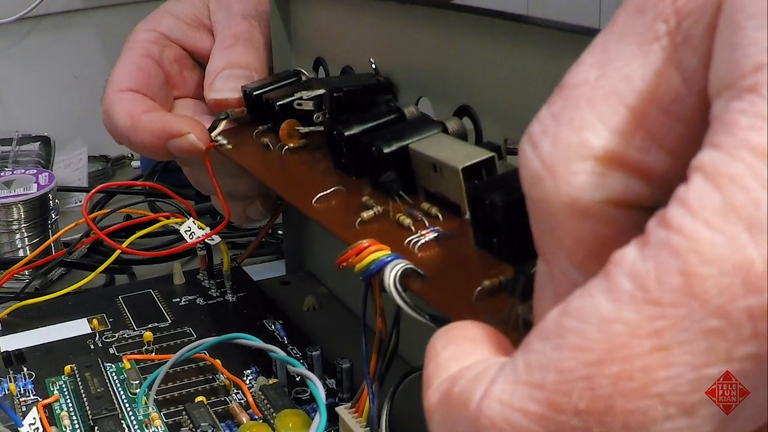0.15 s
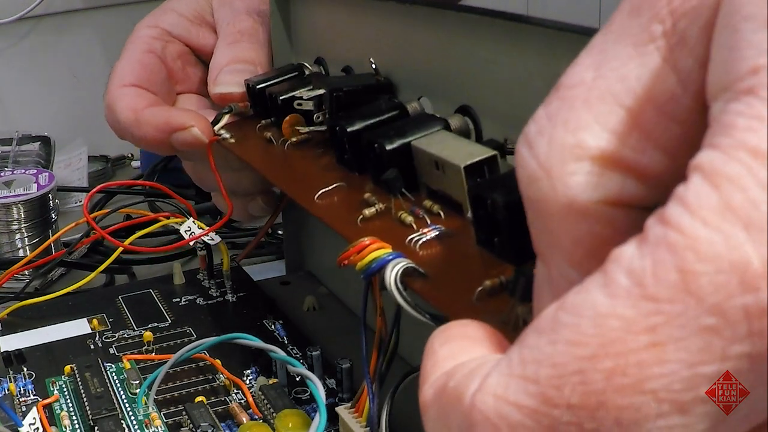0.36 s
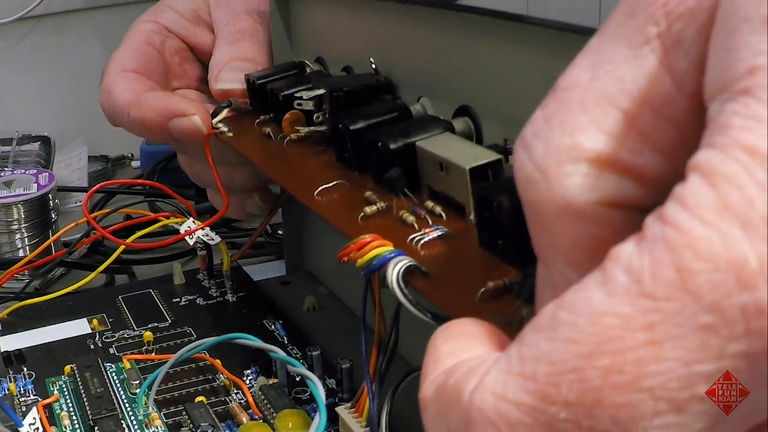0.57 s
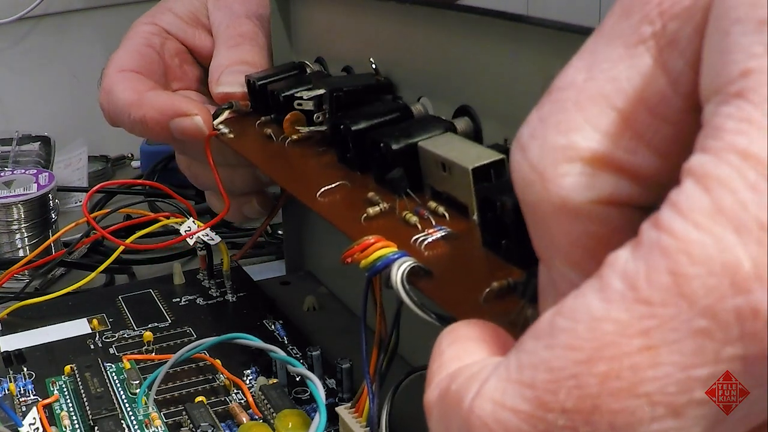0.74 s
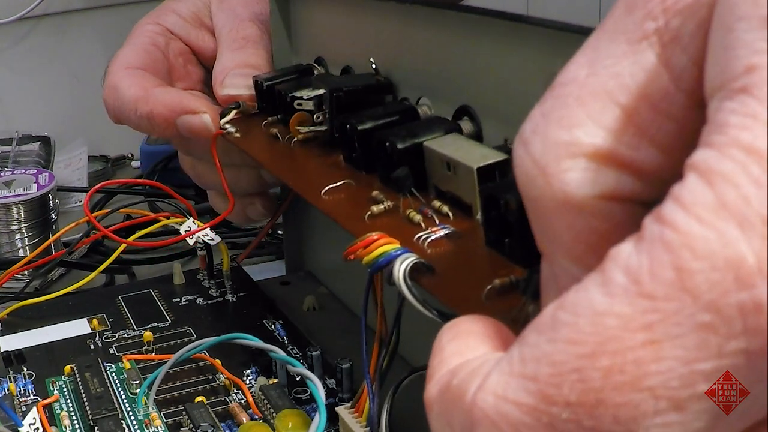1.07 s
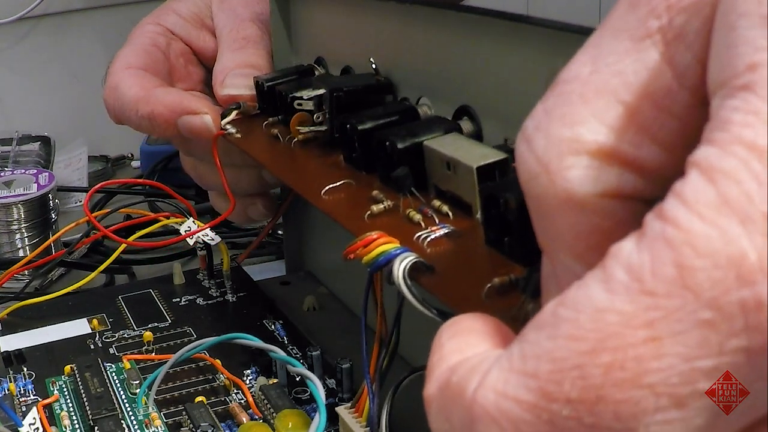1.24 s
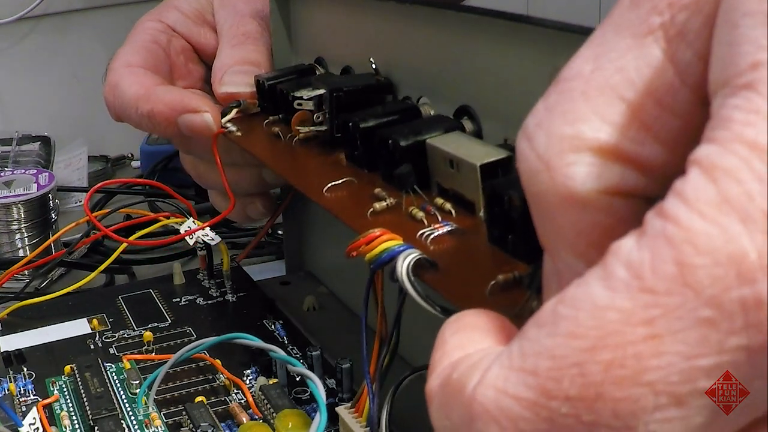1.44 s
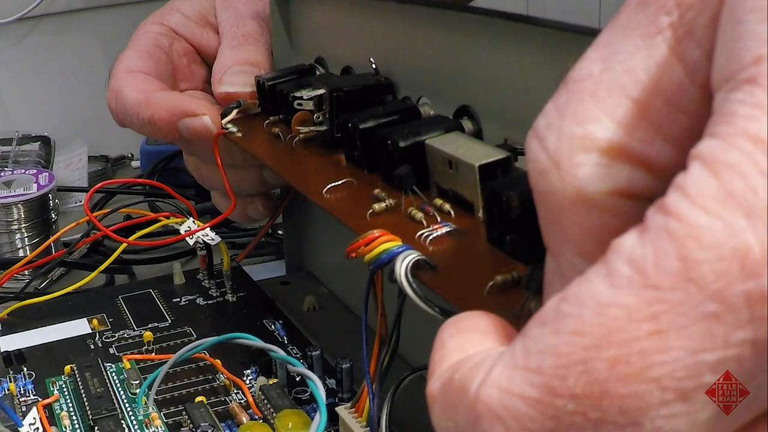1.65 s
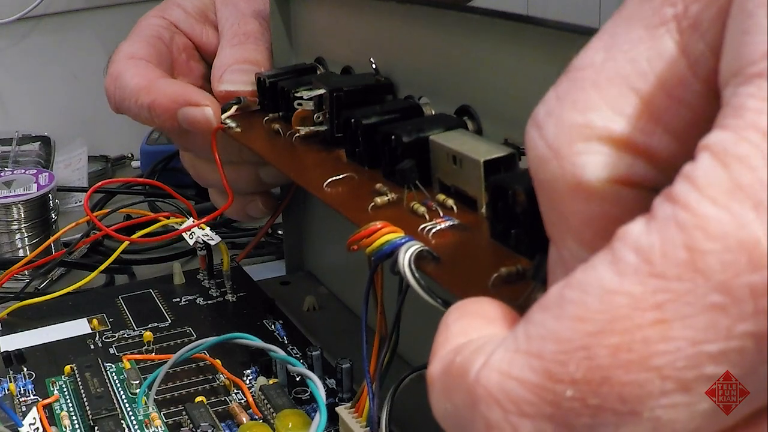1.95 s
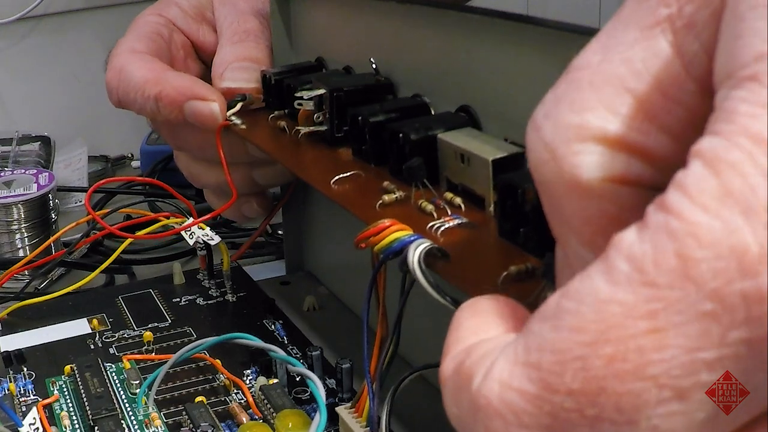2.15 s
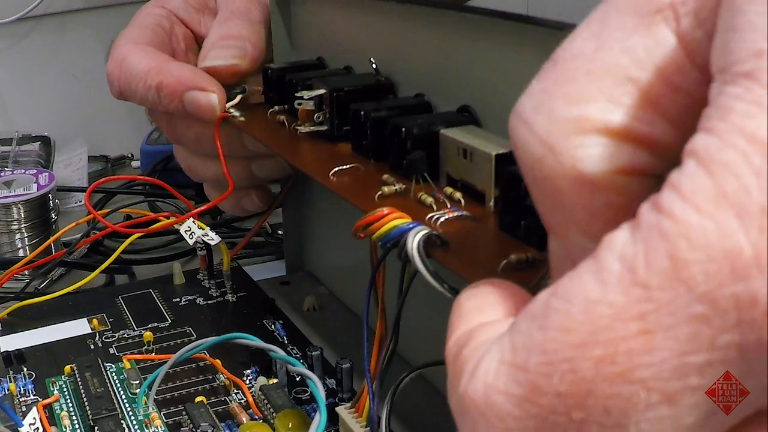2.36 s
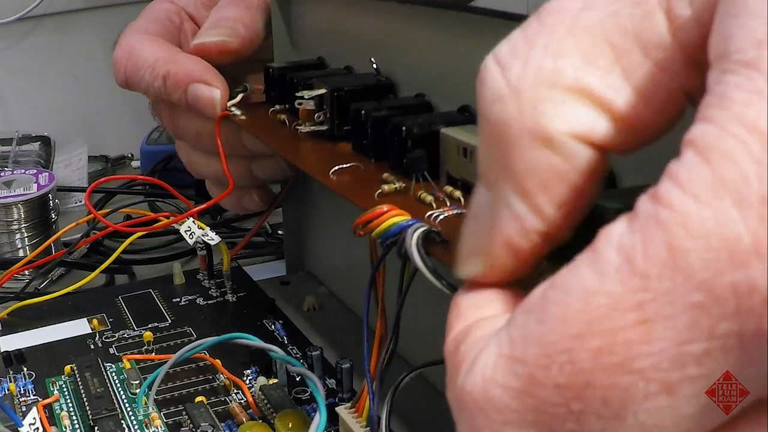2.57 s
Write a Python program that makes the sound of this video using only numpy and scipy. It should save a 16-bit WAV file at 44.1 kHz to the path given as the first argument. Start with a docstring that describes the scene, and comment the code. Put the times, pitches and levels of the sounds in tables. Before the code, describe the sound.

Circuit board handled by fingers, soft knocks and small metal clicks building to a busy clatter

```python
"""Fingers work small metal fittings on a circuit board held over a bench, heard close by.
Soft pushes come first, each a rough shove that makes the board and bench ring low and briefly.
A harder bunch follows near 0.87 s and a firm knock near 1.42 s; metal clicks rattle, skin rustles.
Knocks and clicks are busiest from 2.04 to 2.25 s, then thin out and stop near 2.5 s.
Throughout, the gripped board murmurs, the bench rumbles, a room echoes and a faint hiss goes on."""
import sys
import numpy as np
from scipy import signal
from scipy.fft import rfft, irfft, next_fast_len
from scipy.io import wavfile
from scipy.ndimage import map_coordinates

SR = 44100
rng = np.random.default_rng(int(sys.argv[2]) if len(sys.argv) > 2 else 0)


def unload_audio(sound):
    """Save the sound as a 16-bit wav file, at the path given as the first command line argument."""
    columns = np.transpose(np.atleast_2d(sound))
    # keep every value between -1 and 1, then stretch to whole-number steps
    steps = np.round(np.clip(columns, -1, 1) * 32767)
    wavfile.write(sys.argv[1], SR, steps.astype(np.int16))


N = 119070  # length of the scene in samples

DRIFT = 0.015  # random relative change of pitch from one blow to the next

# Pushes on the board: start t/s, level/dB of the five mode groups from low to high,
# contact length t/s (time for the push to fade to 1/e)
KNOCKS = [(0.136, -46.5, -77, -77, -75, -71, 0.022), (0.318, -51.5, -64, -77, -59.5, -77, 0.01),
          (0.346, -48, -55, -40.5, -65, -79, 0.011), (0.369, -47.5, -45, -45.5, -58.5, -71, 0.0098),
          (0.437, -35.5, -46, -50.5, -52, -49, 0.0086), (0.451, -37, -43.5, -64, -63, -72, 0.014),
          (0.47, -40, -47, -51, -60, -60, 0.01), (0.509, -54, -61, -69, -63, -74, 0.0048),
          (0.558, -40.5, -55, -74, -74, -86, 0.0073), (0.637, -40.5, -81, -81, -79, -79, 0.003),
          (0.722, -51, -46, -58.5, -58.5, -76, 0.027), (0.741, -67, -53, -73, -49.5, -64, 0.005),
          (0.784, -55.5, -54, -61, -65, -80, 0.0069), (0.851, -54, -46.5, -49, -60, -46, 0.0079),
          (0.8646, -29, -30.5, -40, -37, -31.5, 0.0045), (0.874, -29, -25.5, -41.5, -29.5, -37, 0.0045),
          (0.886, -39, -41, -36, -42, -64, 0.011), (0.896, -40, -58, -54, -44, -49.5, 0.0034),
          (1.083, -44.5, -50.5, -74, -52, -82, 0.0042), (1.091, -49.5, -36, -62.5, -50.5, -80, 0.013),
          (1.105, -40.5, -32, -54.5, -53, -78, 0.0025), (1.125, -40.5, -46.5, -64, -61, -88, 0.0049),
          (1.176, -46.5, -56, -68, -73, -86, 0.0069), (1.38, -41, -66, -58.5, -62.5, -59, 0.0072),
          (1.402, -37, -40, -42.5, -45, -69, 0.011), (1.416, -20, -26.5, -31.5, -38, -63, 0.004),
          (1.458, -66, -42, -56.5, -62, -67, 0.015), (1.623, -49.5, -63, -81, -82, -76, 0.015),
          (1.664, -48, -53.5, -82, -90, -86, 0.013), (1.688, -47.5, -58, -81, -82, -75, 0.0057),
          (1.747, -74, -72, -70, -70, -53, 0.006), (1.792, -38.5, -38, -45.5, -44.5, -47.5, 0.0015),
          (1.803, -33.5, -34, -35, -35.5, -42, 0.0021), (1.874, -37.5, -38.5, -44, -65.5, -46.5, 0.0041),
          (1.893, -43, -44, -72, -63, -69, 0.0034), (2.037, -42, -44, -57.5, -46.5, -57.5, 0.0065),
          (2.0496, -20, -28.5, -36.5, -31.5, -50.5, 0.018), (2.071, -46, -37, -30, -25.5, -30.5, 0.002),
          (2.078, -17, -21, -30, -29.5, -29.5, 0.0046), (2.09, -41.5, -48.5, -43, -19, -25.5, 0.0035),
          (2.166, -30, -39.5, -52.5, -51, -60.5, 0.007), (2.18, -34.5, -24.5, -21.5, -31, -42.5, 0.014),
          (2.184, -16.5, -15, -28, -33, -41.5, 0.008), (2.208, -29.5, -20, -27.5, -26.5, -38, 0.007),
          (2.218, -48.5, -36.5, -37, -24.5, -40, 0.0031), (2.246, -70.5, -29, -63, -72.5, -73, 0.0046),
          (2.36, -30.5, -33, -50.5, -37.5, -46.5, 0.02), (2.387, -50, -42, -37, -38, -32.5, 0.0055),
          (2.409, -69, -50, -50, -65, -61, 0.0093), (2.509, -53.5, -40.5, -60.5, -48, -74.5, 0.006)]
# Height of the single first blow over the rough push, one number per mode group [ratio]
FIRST_TOUCH = [20, 14.3, 14, 8.8, 7.8]
PUSH_RISE_S = 0.0053  # build-up time of a push
TOUCH_GROWS = 0.28  # dB of extra first blow per dB of knock: harder knocks start more sharply
SCATTER_DB = 2.5  # random change of mode levels from knock to knock


def knocks():
    """Each push is a short burst of noise with a sharp first blow, and it shakes the board's modes."""
    out = np.zeros(N + SR)
    t = np.arange(3000) / SR
    for start, *levels, length in KNOCKS:
        push_shape = np.exp(-t / length) * (1 - np.exp(-t / PUSH_RISE_S))
        push = rng.standard_normal((5, len(t))) * push_shape
        push[:, 0] -= np.array(FIRST_TOUCH) * amp(TOUCH_GROWS * (max(levels) + 14))
        rung = signal.fftconvolve(push, mode_groups(SCATTER_DB, DRIFT), axes=1)
        rung /= np.abs(rung).max(1, keepdims=True)  # each group peaks at 1 before its level
        knock = amp(levels) @ rung
        out[round(start * SR):][:len(knock)] += knock
    return out[:N]


# Murmur of the held board: t/s, level/dB of low, middle and high modes (all lowered 9 dB below)
GRIP = [(0.0, -81, -46.5, -68), (0.1, -53, -62, -75.5), (0.32, -60, -62, -70), (0.43, -52, -44.5, -60),
        (0.54, -45, -67.5, -61), (0.74, -51.5, -57, -70.5), (0.86, -46, -52.5, -61),
        (0.96, -58, -67, -71.5), (1.18, -59, -65.5, -99), (1.42, -73, -86, -80), (1.55, -49, -65, -102),
        (1.85, -46.5, -74.5, -49.5), (2.0, -46.5, -62, -75.5), (2.1, -56.5, -52, -63.5),
        (2.24, -66.5, -43, -75), (2.35, -68.5, -49, -80), (2.53, -55.5, -75, -80), (2.7, -64, -99, -96.5)]
# Lumpiness of the grip: level/dB per unit of the wobble, one row per mode group
LUMPS_DB = [
    [5],
    [3],
    [2],
    [1],
    [1],
]


def grip():
    """The hands shake the board with lumpy noise that never stops, so its modes murmur."""
    lumps = amp(np.array(LUMPS_DB) * wobble(25.65))
    shaking = rng.standard_normal((5, N)) * lumps
    rung = signal.fftconvolve(shaking, mode_groups(0, 0), axes=1)[:, :N]
    layers = [rung[0], rung[1] + 0.94 * rung[2], rung[3] + rung[4]]
    return sum(amp(curve(GRIP, column=k + 1) - 9) * unit(x) for k, x in enumerate(layers))


# Ways the board and bench like to ring: f/Hz, level/dB, t60 t/s (time to fade by 60 dB)
BOARD = [(173, -15, 0.11), (182.55, 1.5, 0.12), (208.4, -1, 0.087), (235.5, -0.5, 0.072),
         (288.2, 5.5, 0.089), (323.8, -0.5, 0.079), (383.7, 0.5, 0.085), (467, -8.5, 0.032),
         (498.2, 0, 0.088), (545.5, -6.5, 0.086), (616, -17.5, 0.15), (814.7, 4.5, 0.078), (911, -3, 0.092),
         (1035.8, 8.5, 0.047), (1117, -1, 0.075), (1349, 4.5, 0.028), (1525, -1, 0.042),
         (1718, -10.5, 0.048), (2027, -4.5, 0.016), (2150, -15.5, 0.018), (2566, -12.5, 0.018)]
LOW_HZ, MID_HZ, HIGH_HZ, TOP_MODES_HZ = 225, 430, 700, 1250  # borders between mode groups


def mode_groups(scatter_db, drift):
    """The ringing of board and bench after one tap, in five groups from low to high."""
    edges = [0, LOW_HZ, MID_HZ, HIGH_HZ, TOP_MODES_HZ, SR]
    groups = []
    for low, high in zip(edges, edges[1:]):
        modes = [mode for mode in BOARD if low <= mode[0] < high]
        groups.append(ring(modes, scatter_db, drift))
    return np.array(groups)


SOFT_CYCLES = 0.3  # each mode swells over this many of its cycles


def ring(modes, scatter_db, drift):
    """Each mode is a sine that swells quickly and then dies; they are scaled by their joint strength."""
    t = np.arange(SR // 4) / SR
    hz, db, t60 = np.transpose(modes)[:, :, None]
    db = db + scatter_db * rng.standard_normal(db.shape)
    hz = hz * (1 + drift * rng.standard_normal(hz.shape))
    swell = 1 - np.exp(-t * hz / SOFT_CYCLES)
    waves = amp(db - 60 * t / t60) * np.sin(2 * np.pi * hz * t) * swell
    return waves.sum(0) / np.linalg.norm(amp(db))


BASS_CUT_HZ = 149.7


def board():
    """Knocks and murmur together; the board radiates little below the bass cut."""
    bass_cut = signal.butter(4, BASS_CUT_HZ, "high", fs=SR, output="sos")
    return signal.sosfilt(bass_cut, knocks() + grip())


# Clicks of nuts and washers: start t/s, level/dB before the tone colour, centre f/Hz,
# sharpness Q [ratio], rattle t60 t/s, left over right level/dB
CLICKS = [(0.2944, -61.5, 5400, 4.9, .05, -5), (0.3448, -52, 3070, 0.99, 0.13, 1),
          (0.367, -39.5, 6200, 3.7, 0.032, -3.5), (0.399, -55, 9100, 3.7, 0.048, 0),
          (0.437, -45, 4900, 1.9, 0.034, 5), (0.451, -54.5, 3470, 0.59, 0.088, 8),
          (0.7312, -60.5, 6600, 5.4, 0.16, 1), (0.8627, -44, 2100, 1.2, 0.044, 10),
          (0.871, -43, 3030, 0.21, 0.071, -3), (1.194, -63.5, 7500, 2.2, 0.17, 0),
          (1.404, -62, 3000, 0.53, 0.036, 3), (1.4097, -62, 3500, 0.4, 0.061, 6.5),
          (1.7469, -45.5, 2600, 2.6, 0.0086, 1), (1.788, -53, 6820, 0.27, 0.023, -8),
          (1.798, -45, 4630, 1.4, 0.052, 2), (1.8732, -39, 5900, 4.2, 0.014, 5),
          (1.883, -52.5, 5270, 0.87, 0.053, -1), (2.0706, -33.5, 4800, 0.76, 0.14, -4),
          (2.086, -28.5, 4500, 2, 0.058, 11), (2.0901, -18, 8870, 3.7, 0.027, -2),
          (2.09, -25, 3115, 7.5, 0.028, 1.5), (2.178, -40, 4900, 0.33, 0.34, 2),
          (2.189, -40, 4200, 20, 0.17, -4), (2.199, -35, 7000, 1.6, 0.061, -22),
          (2.2067, -15, 7310, 0.23, 0.04, 1.5), (2.21, -26.5, 3370, 1.5, 0.021, -1),
          (2.221, -49, 7040, 0.33, 0.023, -13.5), (2.251, -51, 7200, 25, 0.087, 16),
          (2.387, -37, 4500, 0.57, 0.043, 1), (2.39, -47, 4400, 13, 0.1, 2)]
# The microphone's colour on the clicks: f/Hz, level/dB
CLICK_COLOUR = [(200, -61), (1000, 6.5), (2500, -1.5), (10000, -8.5), (12000, -20.5), (15500, -20)]
CLICK_RISE_S = 0.00062
CLICK_ALIKE = 0.82  # likeness of the left and right rattle, 1 = the same


def fittings():
    """Each click is a dying noisy rattle through one resonance, and it sets the steel ringing."""
    out = np.zeros((2, N + SR))
    t = np.arange(SR // 4) / SR
    for start, db, hz, q, t60, pan_db in CLICKS:
        rattle = rng.standard_normal((2, len(t))) * amp(-60 * t / t60) * (1 - np.exp(-t / CLICK_RISE_S))
        rattle[1] = CLICK_ALIKE * rattle[0] + np.sqrt(1 - CLICK_ALIKE ** 2) * rattle[1]
        click = resonant_click(rattle, db, hz, q) + steel_ring(rattle, db)
        sides = amp([[db + pan_db / 2], [db - pan_db / 2]])
        out[:, round(start * SR):][:, :len(t)] += sides * click
    return filtered(out[:, :N], lambda hz: amp(along(CLICK_COLOUR, hz)))


# Treble edge of a click at -25 dB; softer ones are duller
EDGE_HZ, EDGE_OCT_PER_DB = 16000, 0.02


def resonant_click(rattle, db, hz, q):
    """The rattle passes one resonance twice and loses treble above an edge."""
    f = np.fft.rfftfreq(rattle.shape[1], 1 / SR)
    width = 1.63 * hz / max(q, 0.3)  # two passes narrow the peak, so each one is wider
    resonance = 1j * f * width / (hz * hz - f * f + 1j * f * width)
    edge = EDGE_HZ * 2 ** (EDGE_OCT_PER_DB * (db + 25.0))
    dulling = 1 + 1j * (f / edge) ** 3
    click = irfft(rfft(rattle) * resonance ** 2 / dulling, rattle.shape[1])
    return click / np.sqrt(np.mean(click[:, :200] ** 2)) / 2  # the loud start sets the level


# Ringing of the steel parts: f/Hz, level/dB, t60 t/s
STEEL = [(3060, -2, .06), (4370, -4, .06), (5300, -8, .06), (6490, -5, .05), (7050, -3, .09),
         (8700, -6, .05), (9500, -8, .05)]
# Ring under a click of -25.5 dB, and dB more per dB of click: harder clicks ring more
STEEL_DB, STEEL_GROWS = -16, 0.13


def steel_ring(rattle, db):
    """The rattle excites the steel's own modes, with levels and pitch varied each time."""
    tones = ring(STEEL, 4, DRIFT)[None]
    steel = signal.fftconvolve(rattle, tones, axes=1)[:, :rattle.shape[1]]
    return amp(STEEL_DB + STEEL_GROWS * (db + 25.5)) * steel / np.linalg.norm(rattle[0])


# Fingers rubbing on the parts: t/s, level/dB (lowered 3.5 dB below)
RUSTLE = [(0, -70.5), (.1, -76), (.29, -73), (.35, -64), (.47, -62), (.62, -74.5), (.72, -76), (.75, -77),
          (.84, -70), (.9, -63.5), (1.05, -76.5), (1.37, -77), (1.41, -60), (1.52, -76.5), (1.74, -72),
          (1.752, -55.5), (1.83, -55.5), (1.9, -60.5), (2.03, -76), (2.07, -56.5), (2.2, -64.5),
          (2.35, -65.5), (2.5, -78.5), (2.7, -85)]
# Tone of the rubbing skin: f/Hz, level/dB
SKIN = [(700, -16), (1300, 5), (2500, -4.5), (4200, -10), (6500, -9.5), (8500, -13.5), (11000, -46),
        (15000, -38.5)]
GRAIN_DB = 1.5  # graininess, dB per unit of the wobble


def rustle():
    """Skin rubs on metal and wire: hiss whose level shakes quickly, like grains."""
    skin = hiss(SKIN, [(1000, 0.458), (8000, 0.13)])  # f/Hz, left-right likeness
    return amp(curve(RUSTLE) - 3.5) * unit(amp(GRAIN_DB * wobble(450)) * skin)


# The bench's deep rumble: t/s, level/dB
THUD = [(0.0, -81.5), (0.5, -63), (0.61, -76), (0.65, -69.5), (0.82, -55), (0.85, -56), (0.89, -55.5),
        (1.04, -76), (1.33, -92.5), (1.42, -53.5), (1.54, -78.5), (1.75, -90), (1.8, -64.5), (1.89, -75),
        (1.95, -51), (1.99, -75), (2.11, -44), (2.16, -80), (2.22, -83.5), (2.32, -90), (2.38, -60),
        (2.44, -76.5), (2.68, -80), (2.7, -97)]
# Tone of the rumble: f/Hz, level/dB
RUMBLE = [(25, -38), (48, -30), (65, -7.5), (100, -9), (135, -22), (200, -64.5)]


def bench_rumble():
    """The bench's deep rumble is low noise that rises and falls with the table."""
    return amp(curve(THUD)) * hiss(RUMBLE, [(60, 0.11)])


# How long the echo lasts: f/Hz, t60 t/s
ROOM = [(150, 0.33), (600, 0.3), (2000, 0.23), (6000, 0.29), (14000, 0.15)]


def room(x):
    """Each frequency of the echo dies at its own speed; a new noise tail every fifth of a second."""
    out = np.zeros((2, N + SR))
    step = SR // 5
    for start in range(0, N, step):
        hz, t, cells = signal.stft(rng.standard_normal((2, SR // 2)), SR, nperseg=256)
        fade = amp(-60 * t / along(ROOM, hz)[:, None])
        tail = signal.istft(cells * fade, SR, nperseg=256)[1]
        tail /= np.linalg.norm(tail[0])
        wet = signal.fftconvolve(x[:, start:start + step], tail, axes=1)
        out[:, start + 200:][:, :wet.shape[1]] += wet  # the echo comes 200 samples late
    return out[:, :N]


BOARD_WET_DB, WIDE_HZ = -13, 700  # well below WIDE_HZ the echo is nearly alike on both sides


def board_echo(dry_board):
    """The room's answer to the board, with the left-right difference weakened in the bass."""
    echo = room(amp(BOARD_WET_DB) * dry_board)
    middle = echo.mean(0)
    return middle + filtered(echo - middle, lambda hz: hz / (hz + WIDE_HZ))


# Tone of the background floor: f/Hz, level/dB per Hz (relative)
FLOOR = [(18, -63), (30, -44.5), (77, -14), (342, 1), (456, -3.5), (506, -14.5), (832, -16), (1970, -28),
         (2700, -38), (5910, -51), (6740, -48.5), (15600, -40)]
# Left-right likeness of the floor: f/Hz, likeness [1 = the same]
ALIKE = [(60, 0.14), (200, 1), (1000, 0.088), (4000, 0.18), (12000, 0.17)]
FLOOR_DB = -65.5


def background_floor():
    """A faint steady hiss whose level wavers a little."""
    return amp(FLOOR_DB + wobble(24.0)) * hiss(FLOOR, ALIKE)


def hiss(spectrum, alike):
    """Stereo noise of rms 1: a shared part plus a part of opposite sign on the two sides."""
    def turn(hz):
        return np.arccos(np.clip(along(alike, hz), -1, 1)) / 2

    def response(hz):
        return amp(along(spectrum, hz)) * [np.cos(turn(hz)), np.sin(turn(hz))]

    mid, side = filtered(rng.standard_normal((2, N)), response)
    return unit(np.array([mid + side, mid - side]))


MOST_TURN = 1.2  # the phase between the sides stops growing at this many radians
RIGHT_TREBLE_DB, TREBLE_HZ = 1.5, 7000  # the right side hears a little more treble


def lagged(x, lag_s):
    """The left side hears later, and less of the treble."""
    side = np.array([[1], [-1]]) / 2

    def response(hz):
        phase = MOST_TURN * np.tanh(2 * np.pi * hz * lag_s / MOST_TURN)
        treble_db = RIGHT_TREBLE_DB * hz ** 2 / (hz ** 2 + TREBLE_HZ ** 2)
        return np.exp(-1j * side * phase) * amp(-side * treble_db)

    return filtered(x, response)


def amp(db):
    """Decibels to a plain multiplier."""
    return 10 ** (np.asarray(db) / 20)


def unit(x):
    """Scale to rms 1."""
    return x / np.sqrt(np.mean(x ** 2) + 1e-20)


def along(points, hz):
    """Read a table of (f/Hz, value) on a log frequency axis."""
    f, v = np.transpose(points)
    return np.interp(np.log(hz + 1), np.log(f + 1), v)


def curve(rows, column=1):
    """One column of a table, read at every sample."""
    table = np.array(rows)
    return np.interp(np.arange(N) / SR, table[:, 0], table[:, column])


def wobble(rate):
    """A smooth random curve through `rate` random points a second."""
    knots = rng.standard_normal(int(N * rate / SR) + 4)
    return map_coordinates(knots, [np.arange(N) * rate / SR])


def filtered(x, response):
    """Multiply the spectrum of x by a response of frequency."""
    m = next_fast_len(N + SR // 2)
    return irfft(rfft(x, m) * response(np.fft.rfftfreq(m, 1 / SR)), m)[..., :N]


BOARD_LAG_S, CLICK_LAG_S = 0.000045, 0.00006
CLICK_WET_DB = -13.5


def scene():
    """Board, fittings, rustle and floor with their side lag, plus click echo and rumble."""
    board_sound = np.tile(board(), (2, 1))
    metal = fittings()
    board_part = lagged(board_sound + board_echo(board_sound), BOARD_LAG_S)
    bright_part = lagged(metal + rustle() + background_floor(), CLICK_LAG_S)
    click_echo = room(amp(CLICK_WET_DB) * metal)
    return board_part + bright_part + click_echo + bench_rumble()


TOP_HZ = 15725


def record(dry):
    """Nothing passes above the band limit."""
    return filtered(dry, lambda hz: hz < TOP_HZ)


dry = scene()
out = record(dry)
unload_audio(out)
```